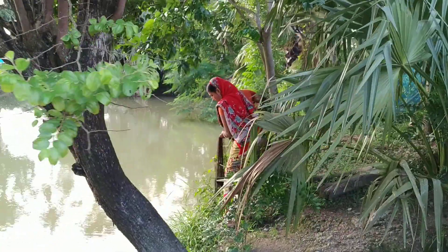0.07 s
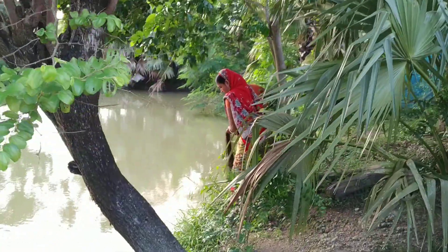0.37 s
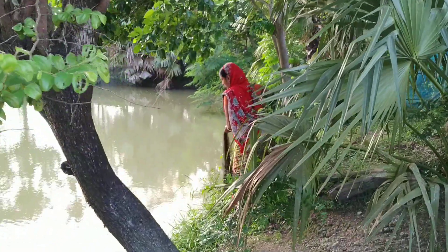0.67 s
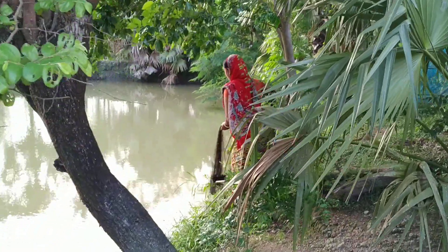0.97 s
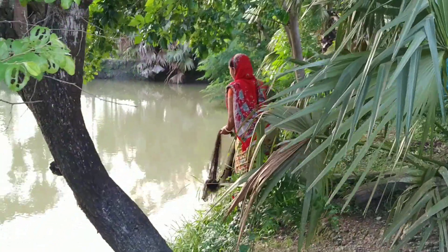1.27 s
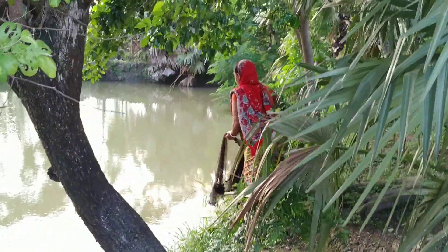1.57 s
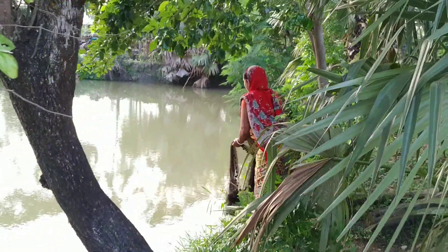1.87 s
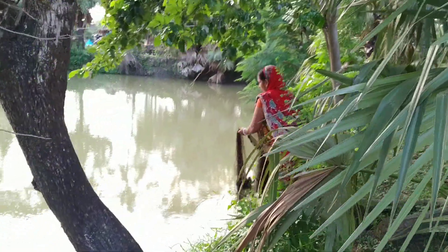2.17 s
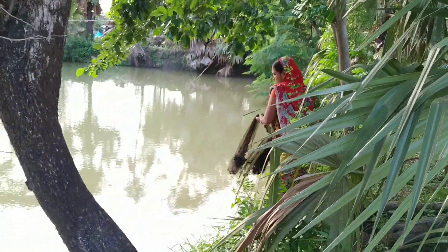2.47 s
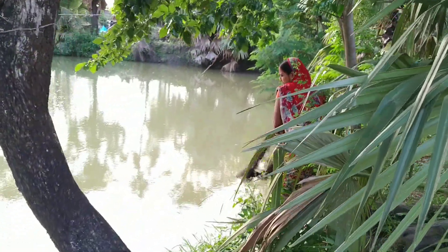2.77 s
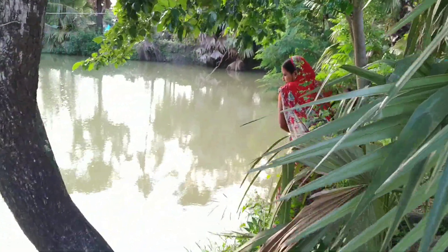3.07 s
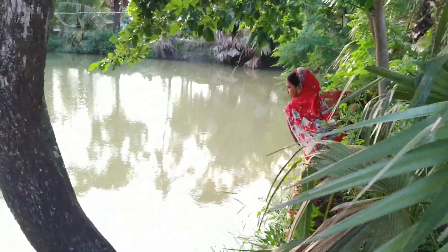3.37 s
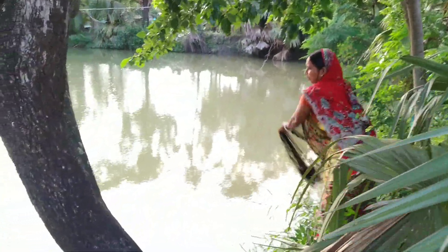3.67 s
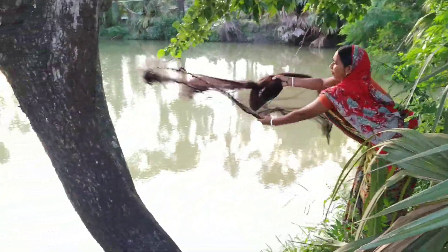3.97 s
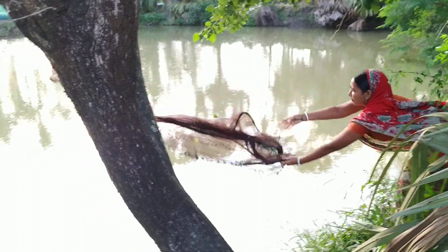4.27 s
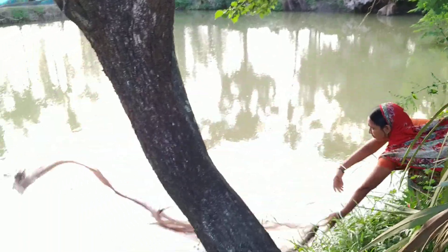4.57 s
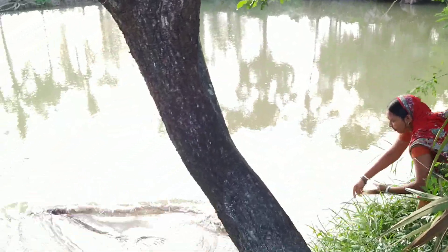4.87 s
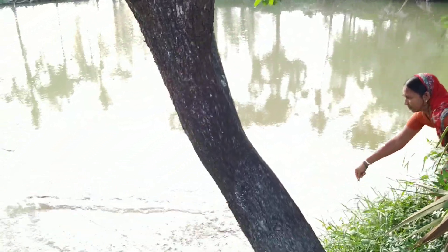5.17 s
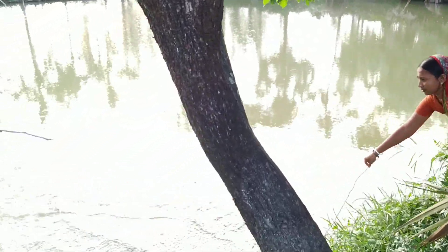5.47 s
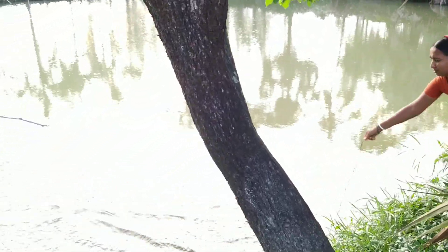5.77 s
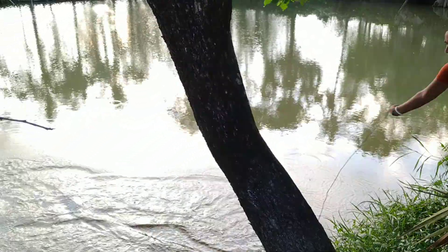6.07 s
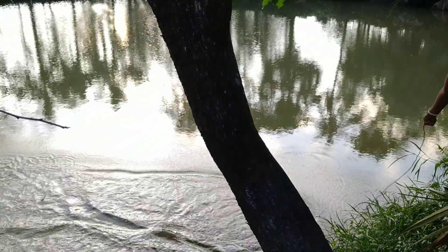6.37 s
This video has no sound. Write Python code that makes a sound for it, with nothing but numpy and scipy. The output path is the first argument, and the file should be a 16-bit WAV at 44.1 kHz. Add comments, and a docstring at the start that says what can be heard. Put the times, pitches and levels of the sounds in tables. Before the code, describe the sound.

Beside a tree-lined pond, low wind puffs hit the right side of a hand-held microphone while a finger bumps the muffled left side, then peels off with a loud pop and scrape. Birds whistle some way off. A cast net swishes softly through more wind, splashes onto the water and sinks with fizzing spray and bubbles. The finger rubs and thumps on the microphone again as the fizz fades.

```python
"""A tree-lined pond, from the bank, on a hand-held stereo recorder. At first wind puffs on the right
microphone port while a finger shifts over the left; at 1.5 s it peels off with a pop that ducks the
limiter. Birds call from the trees, some way off. At 3.9 s a cast net swishes out; at 4.6 s its weighted
rim slaps the water and the mesh sinks in spray and bubbles. From 5 s the finger rubs back over the
left port, and the fizz dies away."""
import sys
import numpy as np
from scipy import signal
from scipy.fft import rfft, irfft
from scipy.io import wavfile
from scipy.ndimage import map_coordinates

SR = 44100
rng = np.random.default_rng(int(sys.argv[2]) if len(sys.argv) > 2 else 0)


def to_wav(sig):
    """Store sig (one row per channel, or 1-D mono) as 16-bit WAV at the path in sys.argv[1].

    Samples outside -1..1 are clipped; the rate is SR.
    """
    pcm = np.clip(np.atleast_2d(sig), -1, 1) * 32767
    pcm = np.round(pcm).astype(np.int16)
    wavfile.write(sys.argv[1], SR, pcm.T)  # frames by channels


N = 283563
TIME = np.arange(N) / SR


def from_db(db):
    """Decibels to gain."""
    return 10 ** (np.asarray(db) / 20)


def rms_one(x):
    """Scale to rms 1."""
    return x / np.sqrt(np.mean(x ** 2) + 1e-20)


def gains(rows):
    """One gain curve for each dB column."""
    times, *columns = np.transpose(rows)
    return [from_db(np.interp(TIME, times, db)) for db in columns]


def swell(s, attack, hold, t60):
    """A gain that rises from time s, holds and dies away."""
    t = TIME - s
    return np.clip(t / attack, 0, 1) * from_db(-60 * np.clip((t - attack - hold) / t60, 0, 4))


def together(levels):
    """Unrelated sounds add in power."""
    return np.sqrt(sum(level ** 2 for level in levels))


def add(out, s, sound):
    """Mix a short sound in at time s."""
    at = max(int(s * SR), 0)
    out[at:at + len(sound)] += sound[:N - at]


def butter(x, hz, kind, order=2):
    """Causal Butterworth filter."""
    sos = signal.butter(order, np.clip(hz, 10, .45 * SR), kind, fs=SR, output="sos")
    return signal.sosfilt(sos, x + 1e-18)


def colour(x, spectrum):
    """Give a steady signal a spectrum; rms 1."""
    hz, db = np.transpose(spectrum)
    bin_hz = np.maximum(np.arange(N // 2 + 1) * SR / N, 1)
    response = from_db(np.interp(np.log(bin_hz), np.log(hz), db))
    return rms_one(irfft(rfft(x) * response, N))


def noise(spectrum):
    """Coloured noise; rms 1."""
    return colour(rng.standard_normal(N), spectrum)


def drift(per_s):
    """A smooth random curve with a spread near 1, renewed per_s times a second."""
    knots = rng.standard_normal(N // 8)
    return map_coordinates(knots, [TIME * per_s], order=3, mode="wrap")


def grains(per_s, spread_db):
    """Random clicks of either sign and uneven size."""
    sizes = from_db(spread_db * np.minimum(rng.exponential(1, N), 5)) * rng.choice([-1, 1], N)
    return sizes * (rng.random(N) < per_s / SR)


def ring(clicks, hz, t60):
    """A unit click sets a sine of height 1 ringing."""
    r, w = from_db(-60 / (t60 * SR)), 2 * np.pi * hz / SR
    return signal.lfilter([0, np.sin(w)], [1, -2 * r * np.cos(w), r * r], clicks + 1e-18)


def thumps(rows, skirt=3.02):
    """A push on a port swings the pressure one way and then back."""
    out, t = np.zeros(N), TIME[:SR // 10] - .05
    for s, db, half_swing, *_ in rows:
        pulse = -t / (1 + (t / (2 * half_swing)) ** 2) ** skirt
        add(out, s + t[0], from_db(db) * pulse / pulse.max())
    return out


# open air over the pond: f/Hz, density/dB
AIR_SPECTRUM = [(20, 5), (50, -4.5), (90, -7), (170, -19), (350, -22), (650, -23), (1400, -26),
                (2800, -22.5), (5200, -21.5), (7500, -24), (9300, -22.5), (11000, -29.5), (15500, -36.5)]
def open_air(level_db=-42, alike_below_hz=1500):
    """Distant ambience at both microphones, partly alike in the bass."""
    shared = 1.13 * butter(noise(AIR_SPECTRUM), alike_below_hz, "low")
    return [from_db(level_db) * rms_one(shared + noise(AIR_SPECTRUM)) for port in range(2)]


def trees(x, echo_db=-4.5, t60=0.65, build_s=0.0023):
    """Trunks and leaves round the pond add a short echo that starts at once and fades."""
    t = TIME[:SR]
    echo = rng.standard_normal(SR) * from_db(-60 * t / t60) * (1 - np.exp(-t / build_s))
    return from_db(echo_db) * signal.fftconvolve(x, echo / np.sqrt(np.sum(echo ** 2)))[:N]


# whistles and rasps in the trees: t/s, length/s, first f/Hz, settled f/Hz, level/dB, roughness
BIRD_WHISTLES = [(0, .079, 6600, 6420, -57, .25), (2.587, 0.042, 2550, 2395, -48, 0.5),
                 (2.794, 0.081, 2500, 2950, -47.5, 0.86), (3.33, 0.1, 3700, 3450, -50.5, 1.1),
                 (3.43, 0.18, 3000, 3110, -41, 0.57), (3.608, .21, 3850, 4574, -41, .52),
                 (3.678, .18, 2980, 3093, -40, 0.53), (3.68, .11, 2800, 2500, -56, 0.92),
                 (4.23, .08, 5400, 5250, -53.5, .9), (4.447, 0.065, 2650, 2870, -46.5, .55),
                 (4.494, 0.033, 2595, 2605, -36, 0.07), (5.409, 0.15, 3150, 3030, -48, 0.64),
                 (5.55, .18, 2920, 2830, -51, 0.35), (6.1, .08, 3200, 3610, -45, .7),
                 (6.164, 0.15, 3750, 4070, -41.5, 0.41), (6.304, 0.15, 3990, 3545, -48.5, 1.17)]
# rising two-note calls: t/s, centre of first note f/Hz, first level/dB, second level/dB
BIRD_CALLS = [(2.09, 1980, -55, -59), (2.705, 1644, -52, -58), (3.101, 2104, -50.5, -43)]
# low coos, far off: t/s, length/s, first f/Hz, last f/Hz, level/dB
FAR_COOS = [(0.647, 0.067, 720, 710, -53.5), (5.706, 0.24, 286.3, 398, -54), (6.06, .056, 329, 316, -48)]
def bird_notes(settle_s=.022, call_note_s=.065, step_s=.063, leap=1.61, call_rough=.57, coo_rough=.2):
    """Yield (start, pitch curve, dB, roughness): whistles settle on a pitch, calls and coos slide."""
    for s, length, first, settled, db, rough in BIRD_WHISTLES:
        glide = np.exp(-TIME[:int(length * SR)] / settle_s)
        yield s, settled + (first - settled) * glide, db, rough
    upslide = np.geomspace(np.sqrt(.85), 1 / np.sqrt(.85), int(call_note_s * SR))
    for s, hz, first_db, second_db in BIRD_CALLS:
        yield s, hz * upslide, first_db, call_rough
        yield s + step_s, hz * upslide * leap, second_db, call_rough
    for s, length, first, last, db in FAR_COOS:
        yield s, np.geomspace(first, last, int(length * SR)), db, coo_rough


def birds(waver=0.0452, rasp_width=0.12, attack_s=0.0082, release_s=0.011, fade_db_per_s=17):
    """Each note glides in pitch; roughness shakes the whistle and spreads a band of rasp round it."""
    out, wobble = np.zeros(N), drift(per_s=350)
    for s, hz, db, rough in bird_notes():
        t = TIME[:len(hz)]
        shaken_hz = hz * (1 + waver * rough * np.interp(s + t, TIME, wobble))
        phase = 2 * np.pi * np.cumsum(shaken_hz) / SR
        flutter = rms_one(butter(rng.standard_normal((2, SR // 2)), rasp_width * hz.mean(), "low"))
        rasp = flutter[0, -len(t):] * np.sin(phase) + flutter[1, -len(t):] * np.cos(phase)
        rasp_share = np.clip(rough, 0, 1) ** 2.4
        voice = np.sqrt(2 * (1 - rasp_share)) * np.sin(phase) + np.sqrt(rasp_share) * rasp
        shape = np.minimum(1, np.minimum(t / attack_s, t[::-1] / release_s))
        add(out, s, from_db(db - fade_db_per_s * t) * shape * voice)
    return out


# turbulence right on the microphone: f/Hz, density/dB
WIND_SPECTRUM = [(15, -10), (40, 9), (100, 2.5), (170, -4), (260, -17.5), (400, -28.5), (800, -47),
                 (2000, -49.5)]
# light breeze: t/s, level/dB
BREEZE_LEVELS = [(0, -34), (.85, -56), (1.3, -45), (2.45, -65), (2.8, -43), (3.4, -51), (3.8, -57),
                 (4.4, -35.5), (5.95, -46.5), (6.15, -52)]
# puffs on top of it: t/s, hold/s, level/dB
WIND_PUFFS = [(0, 0.052, -41), (0.142, .21, -28), (0.678, .03, -37), (3.868, 0.06, -24.5),
              (4.005, 0.12, -31.5), (4.238, 0.081, -31.5), (4.44, .14, -29)]
# eddies that hit the port: t/s, peak/dB, half swing/s
WIND_EDDIES = [(.2, -22, 0.002), (.256, -22, 0.0012), (.317, -20, 0.0015), (.345, -17.5, 0.0016),
               (2.885, -23.5, 0.0042), (3.53, -26, 0.0033), (3.929, -15.5, 0.0011), (4.275, -20, 0.001),
               (4.45, -14, .002), (4.477, -21, 0.0013), (4.511, -12, 0.001), (4.521, -18, 0.0016)]
def wind(lumps_db=4.5):
    """Lumpy low turbulence on the right port: a light breeze with short puffs."""
    puffs = [from_db(db) * swell(s, .03, hold, t60=.15) for s, hold, db in WIND_PUFFS]
    gust = together(gains(BREEZE_LEVELS) + puffs)
    return gust * noise(WIND_SPECTRUM) * from_db(lumps_db * drift(per_s=40)) + thumps(WIND_EDDIES)


# what gets past the finger to the left microphone: t/s, bass/dB, treble/dB
LEFT_OPENING = [(0, -44, -51), (1.48, -32, -48), (1.56, -1, -8), (3.0, -1.5, -17.5), (4.0, -1, -25.5),
                (4.7, -2.5, -28.5), (5.6, -6, -25), (5.72, -6.5, -41), (6.43, -9.5, -41)]
def finger_shade(x, split_hz=1700):
    """The finger over the left port dulls and weakens the outside sound."""
    bass, treble = gains(LEFT_OPENING)
    return bass * butter(x, split_hz, "low") - treble * butter(x, split_hz, "high", order=1)


# skin pressing on the port: f/Hz, density/dB
PRESS_SPECTRUM = [(12, 6), (35, 1.5), (55, -3.5), (80, -5), (170, -24), (350, -36), (800, -61), (2000, -91)]
# skin rubbing over it: f/Hz, density/dB
RUB_SPECTRUM = [(30, -18), (90, -1.5), (170, 1.5), (350, -0.5), (700, -10), (1400, -21), (2800, -33.5),
                (5600, -49.5), (14000, -60)]
# rumble of the grip: t/s, level/dB
GRIP_LEVELS = [(0, -40), (.42, -38), (.92, -21), (1.2, -31.5), (1.69, -30), (1.86, -48), (4.85, -89),
               (5.02, -36), (6.43, -44)]
# the finger shifts: t/s, hold/s, pressing/dB, rubbing/dB
FINGER_STROKES = [(0.833, 0.25, -30.5, -49), (1.497, .016, -2, -3.5), (4.966, 0.23, -46, -51),
                  (5.177, .21, -21, -30), (5.32, 0.038, -25, -23.5), (5.484, 0.092, -23.5, -30.5),
                  (5.612, 0.049, -20, -21)]
def finger_grip(creep_db=-34, attack_s=0.018):
    """Handling noise on the left port: pressure rumbles, and the skin rubs as it creeps or shifts."""
    grip, = gains(GRIP_LEVELS)
    pressing, rubbing = [grip], [from_db(creep_db) * grip]
    for s, hold, press_db, rub_db in FINGER_STROKES:
        pressing.append(from_db(press_db) * swell(s, attack_s, hold, t60=0.3))
        rubbing.append(from_db(rub_db) * swell(s, attack_s, hold, t60=0.062))
    friction = colour(grains(per_s=2500, spread_db=2.5), RUB_SPECTRUM)
    return together(pressing) * noise(PRESS_SPECTRUM) + together(rubbing) * friction


# the finger bumps the recorder: t/s, peak/dB, half swing/s, click/dB
FINGER_BUMPS = [(.524, -23.5, 0.0014, -48), (.666, -21, 0.0013, -29), (.77, -11.5, 0.00225, -20),
                (0.923, -27, 0.0009, -23), (0.981, -20, 0.0018, -23), (1.033, -23, 0.0016, -24.5),
                (1.05, -13.5, 0.0069, -40), (1.069, -16.5, 0.0014, -33), (1.078, -7, 0.0048, -45),
                (1.513, 9.5, 0.0055, 13.5), (1.525, 6, 0.0036, -20), (5.031, -31, 0.00072, -21),
                (5.199, -15, 0.0023, -36), (5.215, -6.5, 0.0025, -20), (5.344, -8.5, 0.00099, -34),
                (5.5224, -3, 0.00099, -1.5), (6.221, -30, 0.0012, -21.5)]
def finger_bumps():
    """Each bump is a dull click of skin on the case, then a thump in the port."""
    clicks = np.zeros(N)
    for s, _, half_swing, click_db in FINGER_BUMPS:
        clicks[int((s - half_swing) * SR)] = from_db(click_db)
    return ring(clicks, hz=750, t60=0.0027) + thumps(FINGER_BUMPS)


# ringing of a nail's tick on the case: f/Hz, level/dB, t60/s
NAIL_MODES = [(1500, -22, .0012), (6050, -32, .025), (12000, -35, .02)]
def fingernail(at_s=1.484):
    """A fingernail ticks on the case just before the pop."""
    click = np.zeros(N)
    click[int(at_s * SR)] = 1
    return sum(from_db(db) * ring(click, hz, t60) for hz, db, t60 in NAIL_MODES)


def seal_pop(at_s=1.495, suction_db=2.5, suction_s=0.016, pop_db=8.5, decay_s=0.0031, edge_s=0.00052):
    """The lifting finger sucks at the port; the seal breaks and the pressure jumps."""
    t = TIME - at_s
    suction = from_db(suction_db) * np.exp(-np.abs(t) / suction_s)
    release = from_db(pop_db) * np.exp(-np.abs(t) / decay_s)
    return np.tanh(t / edge_s) * np.where(t < 0, suction, release)


# skin scraping the rim of the port: f/Hz, density/dB
SCRAPE_SPECTRUM = [(60, -1), (170, 1), (350, -4.5), (700, -5.5), (1400, -8), (2800, -13), (5600, -24.5),
                   (10000, -33.5), (15000, -37)]
# its slides: t/s, rise/s, level/dB, t60/s
RIM_SLIDES = [(1.503, 0.0048, -13, 0.14), (1.529, 0.062, -17.5, .33)]
def skin_scrape(rough_db=1.1):
    """After the pop the skin slides unevenly off the rim of the port."""
    sliding = together(from_db(db) * swell(s, rise, 0, t60) for s, rise, db, t60 in RIM_SLIDES)
    return sliding * noise(SCRAPE_SPECTRUM) * from_db(rough_db * drift(per_s=150))


def skin_squeak(at_s=1.728, hz=1930, level_db=-40, edge_ratio=1.082):
    """The last of the skin slips off with a short, thin squeak."""
    tone = rms_one(butter(rng.standard_normal(N), [hz / edge_ratio, hz * edge_ratio], "band"))
    return from_db(level_db) * swell(at_s, attack=.005, hold=.015, t60=.03) * tone


# twigs, net weights and drops: t/s, peak/dB, f/Hz, t60/s
SMALL_TICKS = [(1.218, -34, 1500, 0.014), (1.254, -33, 1590, 0.011), (1.797, -36, 1470, 0.023),
               (1.816, -31.5, 2200, 0.022), (3.352, -34.5, 8800, 0.062), (3.556, -22.5, 2880, 0.023),
               (4.351, -25, 8000, 0.0099), (4.576, -23, 9000, .016), (4.739, -17, 5030, 0.004),
               (4.857, -14.5, 4940, .025), (5.24, -25, 4500, 0.024), (5.592, -22, 5070, 0.0079),
               (5.6, -24.5, 6300, 0.012)]
def ticks(edge_ratio=1.47):
    """Small impacts give short dry bursts, each round a pitch of its own."""
    out, t = np.zeros(N), TIME[:SR // 10]
    for s, db, hz, t60 in SMALL_TICKS:
        impact = rng.standard_normal(len(t)) * from_db(-60 * t / t60)
        burst = butter(impact, [hz / edge_ratio, hz * edge_ratio], "band")
        add(out, s, from_db(db) * burst / np.abs(burst).max())
    return out


def net_throw(at_s=3.88, level_db=-42, band_hz=(2700, 4670)):
    """The strands of the mesh rustle over each other as it is flung open."""
    rustle = rms_one(butter(grains(per_s=2900, spread_db=1.8), band_hz, "band"))
    return from_db(level_db) * swell(at_s, attack=0.073, hold=0.063, t60=0.52) * rustle


def bubbles(start_s, per_s, low_hz, high_hz, cycles, spread_db, rise=0.24):
    """Bubbles ring for a like number of cycles and rise in pitch as they surface; rms 1 from start_s."""
    out, span_s = np.zeros(N), N / SR - start_s
    for when, size, strength in rng.random((4000, 3))[:int(per_s * span_s)]:
        hz = low_hz * (high_hz / low_hz) ** size
        age = np.linspace(0, 1, int(cycles / hz * SR))
        level_db = spread_db * min(-np.log(strength), 4)
        chirp = np.sin(2 * np.pi * cycles * age * (1 + rise * age))
        add(out, start_s + when * span_s, from_db(level_db - 60 * age) * chirp)
    return rms_one(out) * np.sqrt(span_s * SR / N)


# spray out on the pond: f/Hz, density/dB
SPRAY_SPECTRUM = [(150, -8), (400, -3.5), (900, -16), (1500, -3), (2800, -1.5), (5000, 2.5), (7500, -0.5),
                  (10000, -3), (14000, -8.5), (16000, -15)]
# the net lands, first its weighted rim, then the spread mesh: t/s, hold/s, spray/dB
NET_LANDINGS = [(4.592, .13, -39), (4.728, 0.077, -28.5)]
# groups of weights drag air down: t/s, bubbles/dB
WEIGHT_PLUNGES = [(4.66, -39), (4.784, -33), (4.895, -44), (5.086, -39), (5.235, -46)]
def net_splash(rise_s=0.12, clumps_db=1.3, crackle_db=1.8, fizz_db=-7.0):
    """Mesh and droplets crackle in clumps, tiny bubbles fizz, the weights drag down larger ones."""
    touch_s = NET_LANDINGS[0][0]
    landings = [from_db(db) * swell(s, 0.0072, hold, t60=0.57) for s, hold, db in NET_LANDINGS]
    foam = from_db(-41.5) * swell(touch_s, rise_s, hold=0.847, t60=0.27)  # until the mesh is under
    ripples = from_db(-52.5) * np.clip((TIME - touch_s) / rise_s, 0, 1)  # these lap on
    plunges = [from_db(db) * swell(s, 0.014, hold=0, t60=0.37) for s, db in WEIGHT_PLUNGES]
    sinking = from_db(-41) * swell(touch_s, rise_s, hold=0, t60=2.75)
    gurgle = bubbles(touch_s, per_s=900, low_hz=519, high_hz=1068, cycles=24.5, spread_db=3.0)
    fizz = bubbles(touch_s, per_s=800, low_hz=2100, high_hz=10500, cycles=20, spread_db=4.5)
    crackle = np.array([colour(grains(per_s=6000, spread_db=-0.5), SPRAY_SPECTRUM) for port in range(2)])
    spray = from_db(crackle_db + clumps_db * drift(per_s=70)) * crackle + from_db(fizz_db) * fizz
    return together([foam, ripples] + landings) * spray + together([sinking] + plunges) * gurgle


def scene(near_send_db=-6, hiss_db=-67.5):
    """Both microphones hear pond and trees; the finger is on the left one, the wind on the right."""
    ticks_and_throw = ticks() + net_throw()
    ports = []
    for water, air in zip(net_splash(), open_air()):
        near = water + ticks_and_throw
        calls = birds()  # far off, so scattered differently at each port
        ports.append(air + calls + near + trees(calls + from_db(near_send_db) * near))
    handling = finger_grip() + finger_bumps() + fingernail() + seal_pop() + skin_scrape() + skin_squeak()
    left = finger_shade(ports[0]) + handling
    right = ports[1] + wind()
    hiss = from_db(hiss_db) * rng.standard_normal((2, N))
    return np.array([left, right]) + hiss


def record(dry, limit_db=0.0, release_db_per_s=115, attack_s=0.00034, ceiling=0.793, cutoff_hz=15900):
    """One limiter ducks both channels and recovers slowly; peaks are then clipped and the treble cut."""
    peak_db = 20 * np.log10(np.abs(dry).max(axis=0) + 1e-9)
    over_db = np.maximum(peak_db - limit_db, 0)
    recovery_db = release_db_per_s * TIME
    held_db = np.maximum.accumulate(over_db + recovery_db) - recovery_db
    pole = np.exp(-1 / (attack_s * SR))
    duck_db = signal.lfilter([1 - pole], [1, -pole], held_db)
    limited = np.clip(dry * from_db(-duck_db), -ceiling, ceiling)
    return signal.sosfilt(signal.ellip(12, .1, 90, cutoff_hz, fs=SR, output="sos"), limited)


dry = scene()
out = record(dry)
to_wav(out)
```